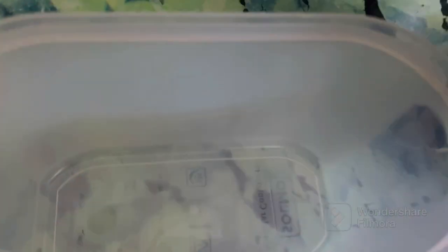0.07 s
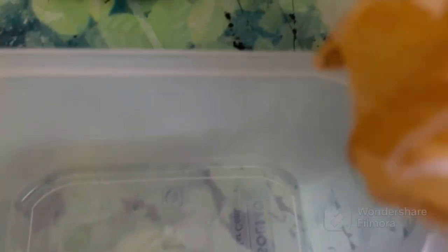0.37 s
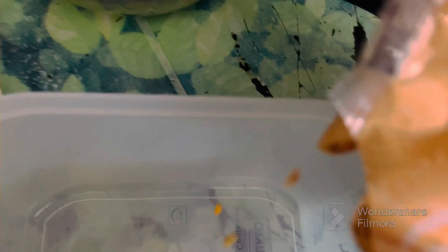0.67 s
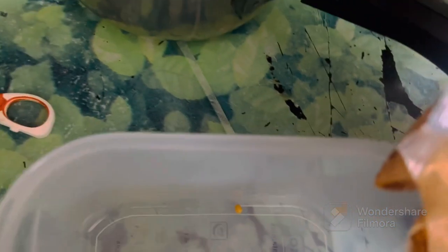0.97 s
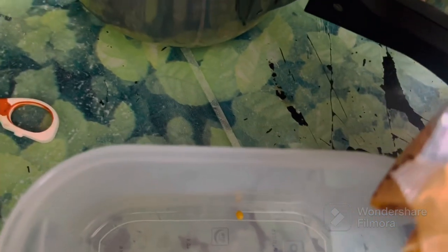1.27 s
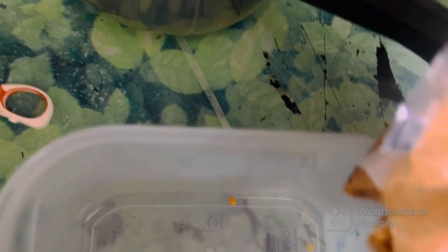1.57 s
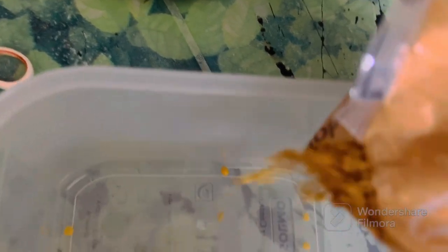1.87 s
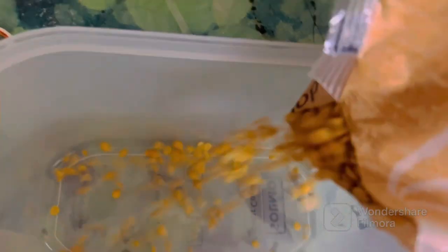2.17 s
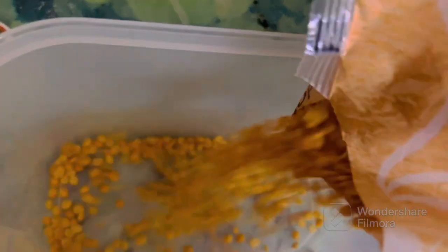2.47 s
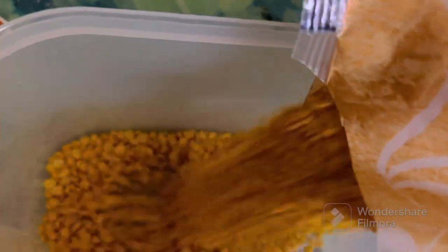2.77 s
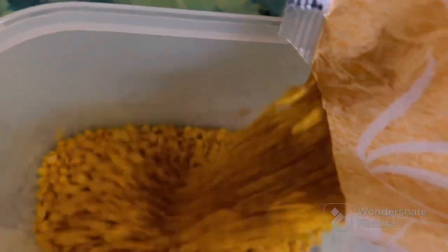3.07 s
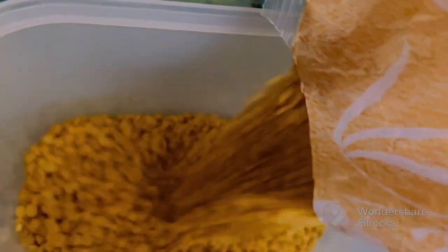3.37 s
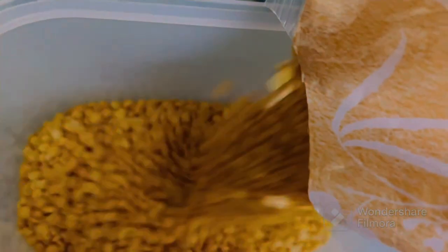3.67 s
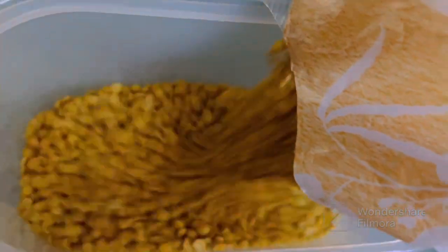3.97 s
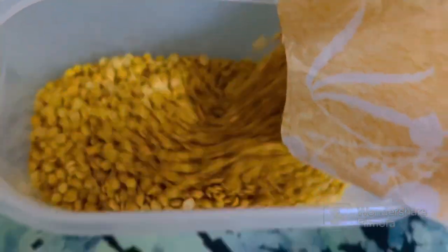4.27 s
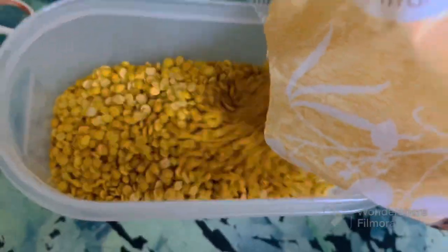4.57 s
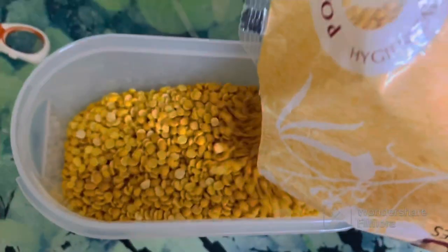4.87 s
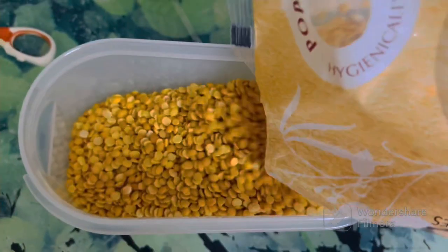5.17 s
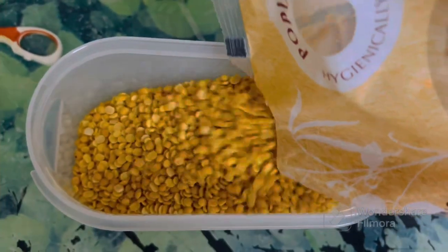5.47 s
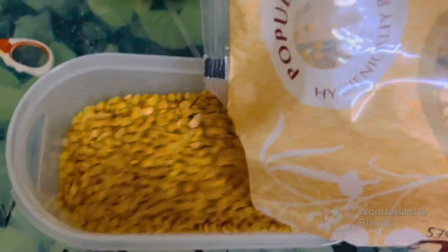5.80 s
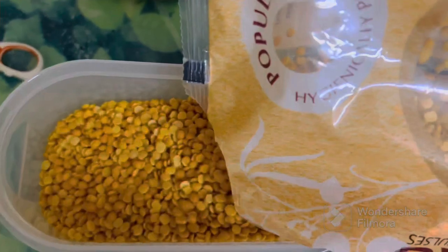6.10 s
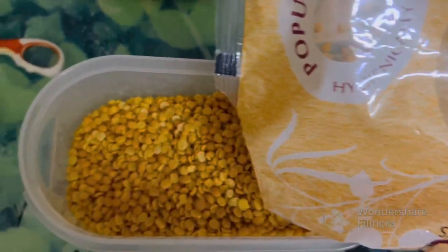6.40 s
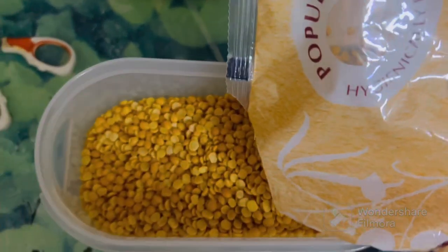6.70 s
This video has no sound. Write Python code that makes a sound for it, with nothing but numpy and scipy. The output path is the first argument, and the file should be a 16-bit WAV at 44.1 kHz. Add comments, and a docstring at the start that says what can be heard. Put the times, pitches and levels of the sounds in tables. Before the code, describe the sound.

A few dried lentils bounce in an empty plastic tub, then a stream drums in and dulls as the packet crinkles.

```python
"""Dried lentils pour from a plastic packet into an empty plastic tub, close to the microphones.
They rustle along the packet, a few bounce on the bare floor of the tub, then the stream drums on it.
A growing heap muffles the drumming, leaving dull thuds and the hiss of lentil on lentil. The last ones
slide out, and the packet crackles as its creases flip over. A kitchen hums and echoes faintly behind."""
import sys
import numpy as np
from scipy import signal
from scipy.fft import rfft, irfft, next_fast_len
from scipy.io import wavfile

SR = 44100
rng = np.random.default_rng(int(sys.argv[2]) if len(sys.argv) > 2 else 0)


def inscribe(sig):
    """Save sig as 16-bit PCM at rate SR to the path in sys.argv[1].

    A 1-D sig is mono; a 2-D sig holds one channel per row.
    Samples are clipped to [-1, 1] before scaling.
    """
    pcm = np.round(np.clip(np.atleast_2d(sig).T, -1, 1) * 32767)
    wavfile.write(sys.argv[1], SR, pcm.astype(np.int16))


N = 297234
TIME = np.arange(N) / SR


def amp(db):
    """Turns decibels into a number to multiply a sound by."""
    return 10 ** (np.asarray(db) / 20)


def unit(x):
    """Scales a signal to an average power of 1."""
    return x / np.sqrt(np.mean(x ** 2) + 1e-20)


def value_at(table, hz):
    """Looks up a frequency in a table, blending between rows on a musical (log) scale."""
    f, value = np.transpose(table)
    return np.interp(np.log(hz + 1), np.log(f + 1), value)


def colour(x, tone, size=2048):
    """Filters a sound to a tone given as (f/Hz, level/dB) rows; white noise would keep its power."""
    log_gain = np.log(amp(value_at(tone, abs(np.fft.fftfreq(size, 1 / SR)))))
    taps = np.fft.ifft(np.exp(np.conj(signal.hilbert(log_gain)))).real  # rings after a hit, not before
    return signal.oaconvolve(x, taps[None] / np.linalg.norm(taps), axes=1)[:, :x.shape[1]]


def add(mix, start_s, sound):
    """Adds a sound to the mix at the given time."""
    part = mix[:, max(round(start_s * SR), 0):][:, :sound.shape[1]]
    part += sound[:, :part.shape[1]]


def stereo_noise(count, apart=.2):
    """Noise that left and right share, plus some of their own, `apart` times as strong."""
    noise = rng.standard_normal((3, count))
    return (noise[0] + apart * noise[1:]) / np.sqrt(1 + apart ** 2)


def collisions(per_s, count=40000, spread_db=3):
    """Jostling lentils hit at uneven gaps and unevenly hard: one spike a hit, average power 1."""
    turns = np.cumsum(rng.gamma(2, .5, count))
    strength = unit(amp(spread_db * np.clip(rng.standard_normal(count), -2, 2)))
    at = np.searchsorted(np.cumsum(per_s) / SR, turns)
    return np.bincount(at, strength, N + 1)[:N] * np.sqrt(SR / per_s)


def bursts(hits, t60):
    """Turns each spike into a puff of noise of the same energy; t60 is the seconds to fade by 60 dB."""
    keep = np.exp(-2 * np.log(1000) / (t60 * SR))
    power = signal.lfilter([1 - keep], [1, -keep], hits ** 2 + 1e-20)
    return np.sqrt(power) * stereo_noise(len(hits))


# Tone of the kitchen's hum: f/Hz, level/dB (levels in all tables are relative)
HUM_TONE = [(25, -42), (55, 0.5), (90, 0.5), (150, 0.5), (230, -16), (500, -16), (1200, -25), (2400, -25),
            (3200, -22.5), (7000, -31), (14000, -64)]
def kitchen_hum():
    """Air in the kitchen makes a low, steady hum."""
    return amp(-52) * colour(stereo_noise(N, apart=0.05), HUM_TONE, size=8192)


# How long the kitchen echoes: f/Hz, time to fade by 60 dB/s
ECHO_TIMES = [(200, 0.63), (2000, 0.33), (8000, 0.32), (16000, 0.032)]
def kitchen_echo(x, build_up_s=0.0087):
    """Many reflections blur into one short tail, whose highest notes die first."""
    hz, t, noise = signal.stft(rng.standard_normal((2, SR // 2)), SR, nperseg=256)
    fade = amp(-60 * t / value_at(ECHO_TIMES, hz)[:, None])
    tail = signal.istft(noise * fade, SR, nperseg=256)[1]
    tail *= np.minimum(np.arange(tail.shape[1]) / SR / build_up_s, 1)
    return signal.fftconvolve(x, tail / np.linalg.norm(tail[0]), axes=1)[:, :N]


# How far ahead the wave is at the left microphone: f/Hz, lead/radians
LEFT_LEAD = [(20, 0), (200, -.2), (600, -1.1), (1000, -.5), (1500, 0), (2400, 1.3), (3000, 1.2), (4000, .5),
             (4800, .9), (5500, 3.1), (7500, 6.3), (10100, 9.4), (12500, 12.6), (15000, 15.7)]
# How much more sensitive the left microphone is: f/Hz, left minus right/dB
LEFT_BOOST = [(60, 0.0), (130, 0.0), (290, 1.0), (640, -1.5), (1410, 0.0), (3100, -1.0), (6820, 0.0),
              (15000, 0.0)]
def microphones(x, travel_s=0.000912):
    """Sound travels to two microphones, which pick it up out of step and slightly unequally."""
    size = next_fast_len(N + SR // 10)
    hz = np.fft.rfftfreq(size, 1 / SR)
    sides = np.array([[.5], [-.5]])
    gain = amp(sides * value_at(LEFT_BOOST, hz))
    phase = sides * value_at(LEFT_LEAD, hz) - 2 * np.pi * hz * travel_s
    return irfft(rfft(x, size) * gain * np.exp(1j * phase), size)[:, :N]


# Tone of a crease flipping over: f/Hz, level/dB
SNAP_TONE = [(500, -41), (2000, -21), (4000, 12), (8000, 14), (13000, -2), (16000, 9)]
# Each buckle of the packet: t/s, level/dB, film pitch/Hz, flutter trim/dB, snap trim/dB, thump trim/dB
BUCKLES = [(.037,-29,850,2.5,-24,-2), (0.16,-15,2460,0.5,-22,-30), (0.163,-10.5,1300,0,-4,-15),
           (.226,-26,1000,4,-14,-16), (0.35,-22,900,-6,-18,-7), (.373,-15.5,900,-4,-22,-11),
           (.495,-16,860,1,-2.5,0), (.571,-25,1020,-2,-22,-3), (1.633,-24.5,1140,5,0,-1.5),
           (1.6386,-31,1308,11,-12,5), (1.713,-19.5,2165,-4,-1,-11), (3.304,-21.5,700,0,-16,-5),
           (3.3125,-20,1108,-8,-12.5,-2), (3.9863,-26,1485,-6,-10,-10.5), (5.001,-18.5,1800,0,-10,-25),
           (5.301,-17.5,2500,1.5,11,-18), (5.632,-13,1500,-1,-20,-7), (5.689,-17.5,2352,-7,5,-23.5),
           (5.724,-23.5,902,3,-19,-6), (5.757,-16.5,1462,0,-2,-23), (5.807,-24,1800,-5,3,-16),
           (5.908,-31,1498,-2,-13,-16), (5.925,-27,900,-1,-8,-12.5), (5.936,-23.5,1300,-3,-2,-16),
           (5.99,-29,1003,-2,-9,-6), (6.044,-29.5,795,-4,-15,-7), (6.125,-33,1593,0,-13,-14),
           (6.1619,-26.5,1598,-0.5,-20,-17), (6.169,-25,1550,1,-25,-26), (6.3503,-8.5,2085,-9,-30,-25.5),
           (6.349,-19.5,3360,-10.5,-22,-29.5), (6.441,-18.5,1746,-2.5,-24,-4), (6.495,-18.5,1330,5,-10,-4),
           (6.498,-21.5,2500,-1,-14,-7), (6.5373,-13.5,1400,-1.5,-15,-8), (6.543,-22.5,1161,-3,-6,-4),
           (6.558,-27,1932,-7.5,-18,-6), (6.589,-26,1279,-1,-11,-12), (6.65,-18,1833,2.5,-20,-16),
           (6.661,-26,1705,-4,-18,-14), (6.677,-22,1300,-3,-21,-8), (6.68,-28.5,390,2,-24,-2)]
def packet_crackles(size=6000, pop_peak_cycles=0.98):
    """A crease snaps, the film around it pops over and flutters, and the whole packet thumps."""
    out, spike = np.zeros((2, N)), signal.unit_impulse(size)
    thump_tone = [(70, -30), (200, -10.5), (380, 4.0), (750, 0.0), (1800, -33.0)]
    for start_s, db, hz, flutter_db, snap_db, thump_db in BUCKLES:
        t60 = 0.037 * (1200 / hz) ** 0.61  # smaller, higher patches of film fade sooner
        cycles = hz * np.arange(size) / SR
        swing = cycles / pop_peak_cycles
        pop = amp(-6) * (swing * np.exp(1 - swing)) ** 2 * np.sin(2 * np.pi * cycles)
        flutter_tone = [(hz / 4, -27), (hz / 1.57, -5), (hz, 0), (hz * 1.4, -3), (hz * 6, -27)]
        flutter = amp(flutter_db + 12) * colour(bursts(spike, t60), flutter_tone)
        thump = amp(thump_db + 11.5) * colour(bursts(spike, 0.92 * t60), thump_tone)
        snap = amp(snap_db + 7.5) * colour(bursts(spike, t60=.007), SNAP_TONE)
        add(out, start_s, amp(db) * (pop + flutter + thump + snap))
    return out


# Tone of a lentil hitting plastic: f/Hz, level/dB
TICK_TONE = [(100, -29), (300, -18.5), (700, -23), (1100, -9.5), (2200, 3.5), (3200, 4), (5000, 5),
             (6500, 4), (8000, 5.5), (12000, -1), (15000, 5.5), (17000, -28)]
def ticks(hits):
    """Each hit is a hard click, then a weaker rattle in the plastic."""
    click, rattle = bursts(hits, t60=.007), bursts(hits, t60=.03)
    return colour(click + amp(-1) * rattle, TICK_TONE)


# Tone of lentils rubbing on the packet's film: f/Hz, level/dB
RUSTLE_TONE = [(80, -18), (250, -26.5), (500, -7.5), (750, 1.5), (1200, -3.5), (1800, 3.5), (2500, 4.5),
               (2900, -3), (3600, -3.5), (4600, -7.5), (7000, -11.5), (11000, -19), (15000, -21),
               (16500, -39)]
def film_rustle(rubs):
    """Each rub on the film makes a short scratch."""
    return colour(bursts(rubs, t60=0.03), RUSTLE_TONE)


# Tone of the dull crunch: f/Hz, level/dB
CRUNCH_TONE = [(80, -21.5), (180, -3), (320, 4), (550, -1.5), (900, 2.5), (1400, 0), (2400, -7),
               (3200, -6.5), (5000, -7.5), (8000, -9.5), (13000, -41)]
def dull_crunch(hits):
    """Lentils moving together make low thuds, in the packet or as they land on the heap."""
    return colour(bursts(hits, t60=0.021), CRUNCH_TONE)


# Each swell of rustle or dull crunch: lentils sliding in the packet, or the stream thudding onto the heap
# t at full level/s, hold/s, level/dB, rise/s, fall/s, clumped share/0-1
SWELLS = [(0.159, .22, -29, 0.24, 0.21, 0.88), (0.652, 0.47, -48.5, 0.27, 0.39, 0.1),
          (1.78, 0.072, -34, 0.18, 0.21, 0.4), (3.296, 0.012, -22.5, 0.022, 0.077, 0.96),
          (3.551, 0.36, -29.5, 0.95, 1.33, 0.93), (4.198, 0.17, -34, .8, 1.02, 0.01),
          (5.134, 0.32, -25, 1.8, 0.53, 0.11), (5.582, 0.064, -29.5, 0.32, 0.23, 0.15),
          (5.923, .01, -39.5, 0.033, 0.16, 0.3), (6.038, 0.0088, -44.5, 0.028, 0.26, 0.97),
          (6.453, 0.076, -36.5, 0.024, 0.093, 0.12), (6.675, 0.0093, -38.5, 0.061, 0.071, 0.83)]
def rustle_and_crunch(fade_db=19.5):
    """Loose lentils rustle along the film; clumped together they give a duller, lumpier crunch."""
    loose, clumped = np.zeros((2, N))
    for full_s, hold_s, db, rise_s, fall_s, share in SWELLS:
        before = np.maximum((full_s - TIME) / rise_s, 0)
        after = np.maximum((TIME - full_s - hold_s) / fall_s, 0)
        power = amp(db - fade_db * (before + after)) ** 2
        loose += (1 - share) * power
        clumped += share * power
    strength = np.sqrt(loose + clumped) / amp(-24)
    rubs_per_s = np.clip(3800 * strength ** 1.05, 140, 5000)  # a stronger swell moves more lentils
    on_film = np.sqrt(loose) * collisions(rubs_per_s)
    in_clumps = np.sqrt(clumped) * collisions(.35 * rubs_per_s)
    rustle = amp(-1.5) * film_rustle(on_film)
    crunch = amp(-6.5) * dull_crunch(in_clumps)
    clicks = amp(-20) * ticks(np.sqrt(clumped) * collisions(rubs_per_s))  # at the packet's mouth
    return rustle + crunch + clicks


def tub_walls(x, size=1500, t60=0.067):
    """Adds the quick, high echoes that pass to and fro between the tub's walls."""
    t = np.arange(size) / SR
    echoes = stereo_noise(size, apart=.4) * amp(-60 * t / t60) * (t > .0006)
    echoes = signal.sosfilt(signal.butter(2, 2000, "high", fs=SR, output="sos"), echoes)
    return x + amp(-16) * signal.oaconvolve(x, echoes / np.linalg.norm(echoes[0]), axes=1)[:, :N]


# The notes the tub's floor rings at: f/Hz, width/Hz (wider fades sooner), level/dB
FLOOR_NOTES = [(427, 165, 1), (534, 137, 4.5), (670, 400, -9.5), (1294, 450, -14), (1764, 236, 3),
               (1910, 125, 6), (2364, 170, 1), (2920, 300, -1.5), (3290, 990, -6.5), (3840, 290, 3),
               (4035, 147, 4), (4540, 140, 1), (6420, 210, -1), (8460, 200, -5.5)]
def tub_ring(hits, apart):
    """The floor's notes swell and fade; each hit lands somewhere new and wakes a different mix."""
    at, out, energy = np.flatnonzero(hits), np.zeros((2, N)), 0
    for hz, width_hz, db in FLOOR_NOTES:
        push, keep = np.zeros((2, N)), np.exp(-np.pi * width_hz / SR)
        # which way, and how far, this note moves the floor at each landing spot
        movement = rng.choice([-1, 1], len(at)) * unit(amp(rng.uniform(-5, 5, len(at))))
        each_side = movement + apart * rng.standard_normal((len(at), 2)).T
        push[:, at] = hits[at] * each_side / np.sqrt(1 + apart ** 2)
        ringer = [1 - keep, 0, keep - 1, 1, -2 * keep * np.cos(2 * np.pi * hz / SR), keep * keep]
        out += amp(db) * signal.sosfilt([ringer, ringer], push + 1e-20 * TIME)
        energy += amp(db) ** 2 * (1 - keep)
    bass_cut = signal.butter(4, 280, "high", fs=SR, output="sos")  # a small floor gives off little bass
    return signal.sosfilt(bass_cut, out) / np.sqrt(energy)


def ping(hz, t60=0.014, glide=0, glide_s=0.00086, size=4000):
    """One note of the plastic swells and fades; it starts higher by the share `glide`, then settles."""
    t = np.arange(size) / SR
    cycles = hz * (t + glide * glide_s * (1 - np.exp(-t / glide_s)))
    loudness = np.minimum(2 * hz * t, 1) * np.exp(-np.log(1000) * t / t60)
    return (loudness * np.sin(2 * np.pi * cycles))[None]


# Hard landings of a lentil or a clump on the bare floor, and the two notes of the spot it hits:
# t/s, tick level/dB, knock level/dB, low f/Hz, low level/dB, high f/Hz, high level/dB
LANDINGS = [(.605,-8,-23.5,1850,-12.5,4274,-22), (0.7054,-9,-25,1870,-20,4230,-26),
            (.76,-14,-36,2332,-29,4450,-32), (.796,-10.5,-26.5,1760,-17,4230,-26),
            (0.814,-26,-53,2400,-38,3640,-38), (0.848,-21,-55,2100,-44,4100,-33),
            (.862,-23,-46,2010,-46,3900,-30), (.884,-21.5,-47,2100,-37,4200,-36),
            (.925,-20.5,-36.5,1900,-28.5,3720,-28), (.933,-30,-58,1900,-42,3720,-36),
            (0.949,-20,-54,2000,-43,3500,-34), (.9663,-22,-42,1995,-46,3800,-39),
            (1.019,-24,-45,1980,-30,3980,-34), (1.058,-28,-60,2000,-38,4000,-42),
            (1.068,-9,-31,2020,-27,3480,-19), (1.181,-15.5,-43.5,2020,-24,4166,-24),
            (1.25,-25.5,-60,2100,-49,3840,-50), (1.29,-27,-67,2087,-43,4020,-46),
            (1.332,-29.5,-62,2000,-40,4000,-44), (1.821,-7,-22,1920,-19.5,3700,-19),
            (1.9014,-8,-22.5,1870,-25,3820,-14.5), (1.9129,-9,-32,1900,-17,4000,-23),
            (1.927,-8.5,-21.5,1900,-23,3960,-8.5), (1.943,-9,-29,1900,-13,3800,-10),
            (1.948,-3,-24,2010,-18,4020,-17), (1.964,-10,-24,1870,-21,3820,-15),
            (1.9685,-10,-31,1910,-19,4070,-24), (1.975,-7,-24,1800,-22,4000,-16),
            (1.998,-13,-23,1850,-20,3760,-13), (2.01,-2.5,-17.5,1950,-18,3950,-21),
            (2.0885,-21,-17,1900,-8.5,4000,-18), (2.1195,-15,-26,1800,-15,3940,-8),
            (2.128,-20,-25,1950,-14,3800,-20), (2.171,-13,-26,1890,-20,4170,-14),
            (2.193,-23,-28,1750,-16,3830,-19), (2.2103,-5,-27,1900,-17,3940,-8),
            (2.248,-7,-31,1900,-11,3940,-7), (2.3221,-15,-29,1940,-8,3770,-19),
            (2.336,-18,-25,1800,-22,4050,-11), (2.39,-13,-21,1900,-18,4000,-17),
            (2.413,-23,-28,1970,-21,3900,-8), (2.446,-17,-22,1890,-6,4000,-15),
            (2.512,-13,-14,1920,-27,4060,-9), (2.52,-24,-25,1800,-25,4100,-8),
            (2.5415,-18,-24,1930,-10,3900,-23), (2.561,-8,-14,1800,-24,4040,-17),
            (2.574,-27,-24,1930,-8,3800,-23), (2.617,-13,-27,1820,-14,4100,-21),
            (2.68,-19,-29,1860,-10,4000,-22), (2.74,-11,-33,1860,-6,3800,-19)]
def lentil_bounces(knock_hz=467, crossing_s=0.00208):
    """A landing ticks and rings its spot and, faintly, the tub; the floor bends with a hollow knock."""
    times, tick_db = np.transpose(LANDINGS)[:2]
    hits = np.zeros(N)
    hits[np.round(times * SR).astype(int)] = amp(tick_db)
    out = amp(10) * ticks(hits) + amp(-0.5) * tub_ring(hits, apart=1.0)
    for start_s, _, knock_db, low_hz, low_db, high_hz, high_db in LANDINGS:
        add(out, start_s, amp(low_db) * ping(low_hz) + amp(high_db) * ping(high_hz))
        # the bend takes time to cross the floor; its faster, higher waves arrive first
        knock = ping(knock_hz * rng.uniform(0.937, 1.17), t60=0.038, glide=0.41)
        add(out, start_s + crossing_s, amp(knock_db) * knock)
    return out


# Tone of a lentil landing on other lentils: f/Hz, level/dB
HEAP_TONE = [(80, -18), (180, -13), (350, 3), (640, 6.5), (770, -8), (1100, 5.5), (1600, 1), (2100, 7),
             (3000, 0.5), (4200, 0), (5800, -6), (9000, -5), (12000, -3), (15000, -1), (16500, -18)]
# The stream leaving the packet: t/s, level/dB (0 is full flow)
POUR_FLOW = [(1.92, -22), (1.96, -14), (2.0, -8.5), (2.16, -7), (2.225, -9.5), (2.25, -6), (2.53, -2),
             (2.8, 1.5), (3.6, -1), (4.1, 1.5), (4.6, -8), (5.0, -12), (5.4, -6.5), (5.72, -10),
             (5.88, -11), (6.25, -33.5)]
def lentil_stream(cover_s=0.23, wall_share=0.0078):
    """Lentils drum on the bare floor until their heap hides it; then they hiss on the heap."""
    flow = amp(np.interp(TIME, *np.transpose(POUR_FLOW), left=-100, right=-100))
    poured_s = np.cumsum(flow ** 2) / SR  # amount poured so far, in seconds of full flow
    bare = np.exp(-poured_s / cover_s)
    plastic_share = bare + wall_share  # a few still hit the walls once the floor is hidden
    on_plastic = flow * np.sqrt(plastic_share) * collisions(per_s=np.maximum(1500 * flow ** 1.35, 250))
    on_heap = flow * np.sqrt(1 - bare) * collisions(per_s=np.maximum(3200 * flow, 120))
    on_floor = on_plastic * np.sqrt(bare / plastic_share)  # hits on the walls only tick
    muffling = amp(-8 * poured_s)  # the heap presses on the floor
    shorter_fall = amp(-5 * poured_s)  # a taller heap means softer landings
    rattle = amp(-16.5) * ticks(on_plastic)
    drumming = amp(-10) * tub_ring(on_floor * muffling, apart=0.54)
    hiss = amp(-27.5) * colour(bursts(on_heap * shorter_fall, t60=0.02), HEAP_TONE)
    return rattle + drumming + hiss


def scene():
    """Lentils and packet close by, with a little of the kitchen around them."""
    near = tub_walls(lentil_stream() + lentil_bounces()) + rustle_and_crunch() + packet_crackles()
    return microphones(near + kitchen_hum()) + amp(-18.5) * kitchen_echo(near)


def record(dry, ceiling=.85, top_hz=16200):
    """Rounds off the loudest ticks, then cuts the very highest treble."""
    rounded = dry / (1 + (dry / ceiling) ** 4) ** .25
    treble_cut = signal.firwin(255, top_hz, window=("kaiser", 9), fs=SR)
    return signal.oaconvolve(rounded, treble_cut[None], "same")


dry = scene()
out = record(dry)
inscribe(out)
```